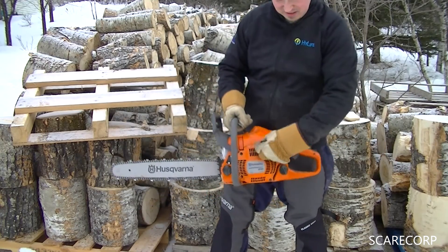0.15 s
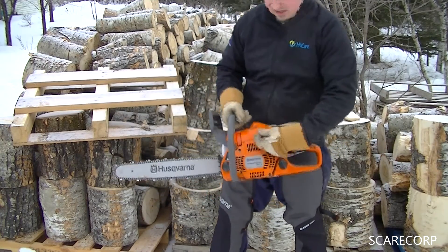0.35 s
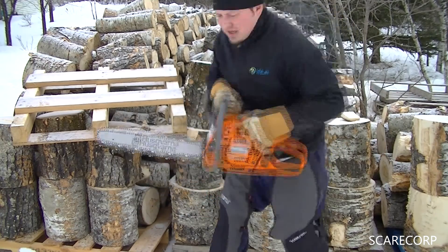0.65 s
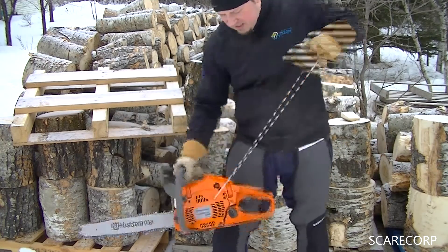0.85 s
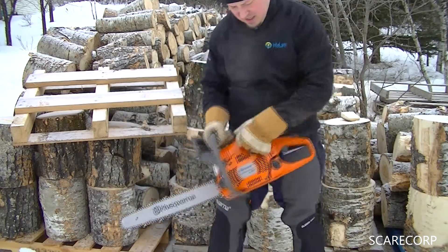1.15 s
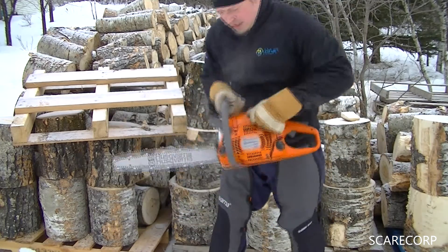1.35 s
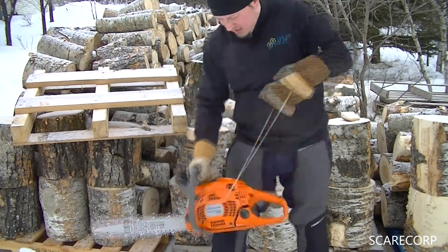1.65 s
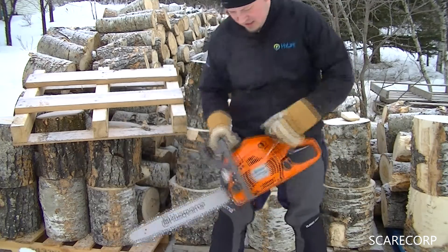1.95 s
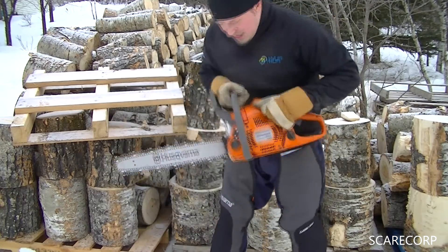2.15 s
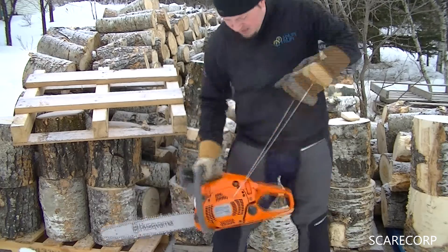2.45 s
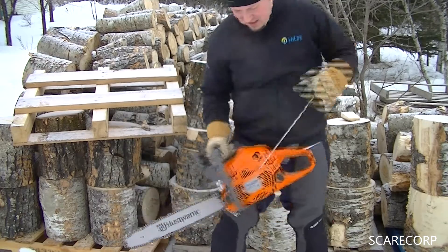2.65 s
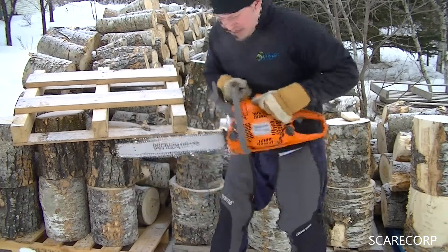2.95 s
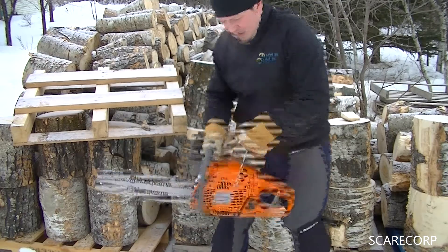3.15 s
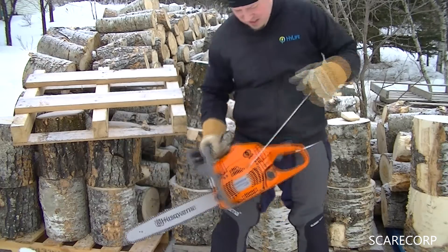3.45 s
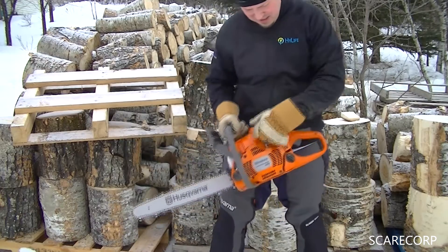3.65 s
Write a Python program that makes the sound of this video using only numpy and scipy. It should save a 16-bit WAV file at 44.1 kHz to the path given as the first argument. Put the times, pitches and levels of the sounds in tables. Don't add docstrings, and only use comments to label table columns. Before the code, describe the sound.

A chainsaw rope starter is yanked four times, puffing and whirring, but the engine never catches.

```python
import sys
import numpy as np
from scipy import signal
from scipy.fft import rfft, irfft
from scipy.io import wavfile
from scipy.ndimage import uniform_filter1d

SR = 44100
rng = np.random.default_rng(int(sys.argv[2]) if len(sys.argv) > 2 else 0)


def transcribe(u):
    v = np.clip(np.atleast_2d(u).T, -1, 1)
    q = np.round(v * 32767).astype(np.int16)
    wavfile.write(sys.argv[1], SR, q)


def gain_from_decibels(decibels):
    exponent = np.asarray(decibels, float) / 20
    return 10 ** exponent


N = 167580


def read(points, hz):
    f, value = np.transpose(points)
    return np.interp(np.log(hz + 1), np.log(f + 1), value)


def evened(x):
    return x / np.sqrt(np.mean(x ** 2) + 1e-20)


def drift(shape, passes):
    noise = rng.standard_normal(shape)
    for size, axis in passes:
        noise = uniform_filter1d(noise, size=size, axis=axis)
    return evened(noise)


def colour(x, points, lifts=()):
    hz = np.fft.rfftfreq(len(x), 1 / SR)
    resonances = sum(lift / (1 + ((hz - f) / width * 2) ** 2) for f, width, lift in lifts)
    below = hz < points[0][0] * .5
    db = read(points, hz) + resonances - 60 * below
    return irfft(rfft(x) * gain_from_decibels(db), len(x))


def add(mix, s, sound):
    part = mix[round(s * SR):][:len(sound)]
    part += sound[:len(part)]


def ring(modes, spread_db, detune, rise_s, scatter=1):
    t = np.arange(4500) / SR
    tones = np.zeros(len(t))
    for hz, t60, db in modes:
        louder, sharper, phase = rng.standard_normal(3)
        fade = gain_from_decibels(db + spread_db * louder - 60 * t / max(t60, .003))
        tones += fade * np.sin(2 * np.pi * hz * (1 + detune * sharper) * t + scatter * phase)
    return tones * (1 - np.exp(-t / max(rise_s, 1e-5)))


# (first puff [s], stretch of the turns [ratio], extra drag [1/s],
# ninth puff [dB], tenth puff [dB])
YANKS = [
    (.786, 1.06, .12, -8, -14),
    (1.636, 1, 0, 0, 0),
    (2.425, 1.01, .28, -3, -3),
    (3.204, .972, 0, 5, -5),
]
# (time after the first [s], puff level [dB])
PISTON_TURNS = [(0, -16), (.029, -16), (.055, -17), (.079, -18.5), (.102, -20), (.127, -16), (.156, -16.5),
                (.188, -17.5), (.233, -22), (.285, -28)]


def turn_times(first, stretch, drag):
    s = np.array(PISTON_TURNS)[:, 0]
    return first + s * (stretch + drag * s)


# (frequency [Hz], t60 [s], level [dB])
MUFFLER_MODES = [(760, 0.05, 0), (660, 0.05, -3), (420, 0.04, -9), (313, 0.04, -15)]
PUFF_RISE_S, PORT_OPEN_S = .002, .0095


def puff(spread_db, detune, scatter):
    tone = ring(MUFFLER_MODES, spread_db, detune, PUFF_RISE_S, scatter)
    t = np.arange(len(tone)) / SR
    return tone * np.exp(-(t / PORT_OPEN_S) ** 3)


# (frequency [Hz], t60 [s], level [dB])
INTAKE_MODES = [(1604, 0.013, 1), (1513, 0.0083, -10.5)]
PUFF_DB, BACK_PUFF_DB, INTAKE_DB = 1.5, -8, -3.5
BACK_PUFF_AT = .5


def piston():
    out = np.zeros(N)
    for first, stretch, drag, ninth_db, tenth_db in YANKS:
        forward = turn_times(first, stretch, drag)
        back = forward + BACK_PUFF_AT * np.gradient(forward)
        level = np.array(PISTON_TURNS)[:, 1] + PUFF_DB
        level[-2:] += ninth_db, tenth_db
        for s, back_s, db in zip(forward, back, level):
            add(out, s - .001, gain_from_decibels(db) * puff(1, .015, 0))
            add(out, back_s, gain_from_decibels(db + BACK_PUFF_DB) * puff(2, .05, 1))
            add(out, back_s, gain_from_decibels(db + INTAKE_DB) * ring(INTAKE_MODES, 4, .03, .0015))
    return out


GRIT_PER_S, GRIT_DB = 1800, 3


def grit():
    out, t = np.zeros(N), np.arange(400) / SR
    for hz in np.geomspace(600, 13000, num=16):
        hits = rng.random(N) < GRIT_PER_S / SR * hz / 6e4
        size = hits * gain_from_decibels(GRIT_DB * np.minimum(rng.exponential(1, N), 3))
        scrape = np.sin(2 * np.pi * hz * t) * t * np.exp(-t * hz / 1.68)
        out += evened(signal.oaconvolve(size, scrape)[:N]) * np.sqrt(hz)
    return evened(out)


# (frequency [Hz], density [dB per Hz])
WHIRR_SPECTRUM = [(88, -67), (150, -15.5), (774, 0), (998, -5.5), (1630, -7), (3550, -12.5), (6770, -11),
                  (11000, -25.5), (16000, -46)]
# (frequency [Hz], width [Hz], lift [dB])
HOUSING_LIFTS = [(1670, 400, 8), (2815, 740, 10), (4092, 98, 11), (4990, 1000, 6), (6640, 760, 0)]
# (pawls catch [s], rope end [s], rewind start [s], rewind end [s])
YANK_STAGES = [
    (.75, .885, 1.085, 1.17),
    (1.593, 1.731, 1.972, 2.04),
    (2.385, 2.515, 2.712, 2.803),
    (3.163, 3.298, 3.52, 3.62),
]
# (yank [dB], coast start [dB], coast end [dB], rewind [dB], settling [dB])
YANK_EFFORT = [
    (-22.5, -31.5, -24.5, -29, -45),
    (-21.5, -29, -30, -34, -44.5),
    (-22, -29.5, -27.5, -30.5, -44.5),
    (-21.5, -30, -28.5, -32.5, -50),
]
WHIRR_DB, GRIT_SHARE, PATCH_DB = -.5, .4, 3
REACH_S, REACH_DB = .018, -18.5
SLACK_DB, TAKE_UP_S, YANK_RISE_DB, SETTLE_S = -9, .042, 3, .13
THROB_DB, THROB_LAG = 1, .96
PUMP_DB, PUMP_DIP_DB = 4, -6
COAST_DULL_DB, REWIND_BRIGHT_DB = -4.5, 1.5


def whirr():
    rub = GRIT_SHARE * grit() + (1 - GRIT_SHARE) * rng.standard_normal(N)
    drive = evened(colour(rub, WHIRR_SPECTRUM, HOUSING_LIFTS))
    hz, t, z = signal.stft(drive, SR, nperseg=256, noverlap=192)
    db, treble, pump = np.full(len(t), -120.), np.zeros(len(t)), np.zeros(len(t))
    for stage, effort, pull in zip(YANK_STAGES, YANK_EFFORT, YANKS):
        catch, end, rewind, stop = stage
        yank, coast_start, coast_end, back, rest = effort
        taut = catch + TAKE_UP_S
        s = [catch - REACH_S, catch - .001, catch, taut, taut + .0034, end + .0087,
             end + .02, rewind - .015, rewind, stop - .008, stop + .0042, stop + SETTLE_S]
        level = [yank + 2 * REACH_DB, yank + REACH_DB, yank + SLACK_DB, yank + SLACK_DB,
                 yank - YANK_RISE_DB, yank, coast_start, coast_end, back, back, rest, rest - 14]
        on = (t > s[0]) & (t < s[-1])
        coast = (t > end + .025) & (t < rewind)
        turns = np.interp(t, turn_times(*pull[:3]), np.arange(len(PISTON_TURNS)), np.nan, np.nan)
        throb = np.nan_to_num(np.cos(2 * np.pi * (turns - THROB_LAG)))
        throb *= THROB_DB * (.33 + 1.75 * coast)
        pump += np.nan_to_num(PUMP_DIP_DB + PUMP_DB * np.cos(4 * np.pi * (turns - .15)))
        db[on] = (np.interp(t, s, level) + throb)[on]
        treble += COAST_DULL_DB * coast + REWIND_BRIGHT_DB * ((t >= rewind) & on)
    octaves = np.clip(np.log2(hz[:, None] / 5000 + 1e-3), 0, 2)
    patches = PATCH_DB * drift(z.shape, [(5, 0), (5, 1)])
    field = db + WHIRR_DB + treble * octaves + patches + pump * (hz[:, None] < 950)
    return signal.istft(z * gain_from_decibels(field), SR, nperseg=256, noverlap=192)[1][:N]


# (time [s], peak level [dB])
RATCHET_TEETH = [(1.0885, -10), (1.101, -12), (1.111, -14), (1.122, -15), (1.1314, -12.5), (1.143, -17),
                 (1.1597, -14), (1.9727, -15.5), (1.979, -17), (1.9901, -13.5), (2.0056, -13),
                 (2.009, -13.5), (2.0244, -15.5), (2.711, -18), (2.7181, -11), (2.7307, -10), (2.741, -15),
                 (2.7517, -10.5), (2.761, -20), (2.7742, -13), (2.7875, -13), (2.799, -26), (3.516, -40),
                 (3.5246, -21), (3.5368, -9.5), (3.5487, -9), (3.557, -12.5), (3.563, -14), (3.5724, -12),
                 (3.586, -11), (3.6009, -13.5)]


def teeth():
    return [(s, db - 1.5, -8) for s, db in RATCHET_TEETH]


# (time [s], peak level [dB], low body [dB])
FIRST_KNOCKS = [(0.7502, -11, -4.5), (0.763, -28, 6), (0.781, -19.5, -18), (0.834, -8, -10.5),
                (0.9043, -20.5, 0), (0.982, -16.5, -31), (1.0222, -12.5, -6.5), (1.0323, -12.5, -6.5),
                (1.044, -24, 7), (1.1868, -20, -3.5), (1.2122, -11.5, -9), (1.27, -37.5, -16)]
SECOND_KNOCKS = [(1.5932, -5, -8), (1.6107, -28, 8), (1.64, -31, 7), (1.7869, -10.5, -34),
                 (1.8165, -15.5, -7), (1.859, -7, -11), (1.878, -17, -10), (1.91, -14.5, -7.5),
                 (1.93, -22, -10), (2.048, -17, -5.5), (2.0944, -23, -6), (2.114, -31, 0)]
THIRD_KNOCKS = [(2.3849, -4.5, -10), (2.4171, -12, -17), (2.502, -16, -13), (2.5327, -15, -1),
                (2.5798, -16, -4), (2.617, -17, -3.5), (2.6552, -17, -20), (2.6686, -12.5, -31),
                (2.823, -19.5, -5.5), (2.8964, -19.5, 1.5)]
LAST_KNOCKS = [(3.1631, -4.5, -6.5), (3.1977, -11.5, -7.5), (3.2991, -11.5, -12.5), (3.3505, -15.5, -25),
               (3.419, -19, -19), (3.4249, -12.5, -17), (3.4576, -20, -6), (3.4727, -17.5, -12),
               (3.4883, -16.5, -18), (3.6351, -14.5, -8), (3.715, -30, 3)]
# (time [s], peak level [dB], low body [dB])
GLOVE_TICKS = [(0.0336, -31, -11.5), (0.2906, -42, -8), (0.34, -41.5, -11), (0.32, -39, -4),
               (0.46, -34.5, -19), (1.45, -44, 3), (1.508, -35, -23), (2.254, -45, -19), (3.032, -53, -13),
               (2.278, -36.5, -31)]
# (frequency [Hz], density [dB per Hz])
CRACK_SPECTRUM = [(1180, -2.5), (2000, -1.5), (3140, -1.5), (4530, 1), (6940, 1), (8260, -7.5),
                  (13500, -24.5), (16000, -42)]
# (frequency [Hz], t60 [s], level [dB])
PAWL_MODES = [(3063, .03, -3), (4200, .06, -3), (5240, .025, -1), (7100, .06, -3), (7450, .05, -5),
              (8550, .3, -24), (9150, .06, -16), (10100, .03, -10), (13050, .07, -24), (15500, .04, -29)]
KNOCK_DB, KNOCK_RISE_S = -7, .0011
CRACK_T60, TOOTH_LINGER = .03, 1.44
SNAP_DB, SNAP_T60, RATTLE_DB, RATTLE_T60, BODY_DB, BODY_T60 = -7.5, .012, -12, .023, 4, .058
PAWL_PULL_DB, PAWL_REWIND_DB, PAWL_SPREAD_DB = -19, -6, 3


def knocks():
    out, t = np.zeros(N), np.arange(2500) / SR
    body_spectrum = [(500, -12), (1000, 4.0), (1650, 7.0), (2500, -2.5), (4000, -40)]
    blows = FIRST_KNOCKS + SECOND_KNOCKS + THIRD_KNOCKS + LAST_KNOCKS + GLOVE_TICKS + teeth()
    for s, db, low_db in blows:
        rewinding = any(start < s < stop for _, _, start, stop in YANK_STAGES)
        linger = TOOTH_LINGER if rewinding else 1
        fade = gain_from_decibels(-60 * t / CRACK_T60 / linger)
        fade += gain_from_decibels(SNAP_DB - 60 * t / SNAP_T60)
        fade += gain_from_decibels(RATTLE_DB - 60 * t / RATTLE_T60)
        crack = fade * evened(colour(rng.standard_normal(len(t)), CRACK_SPECTRUM, HOUSING_LIFTS))
        body = evened(colour(rng.standard_normal(len(t)), body_spectrum))
        body *= gain_from_decibels(low_db + BODY_DB - 60 * t / BODY_T60)
        rise = np.minimum(t / KNOCK_RISE_S, 1) ** 2
        add(out, s, gain_from_decibels(db + KNOCK_DB) * (crack + body) * rise)
        pawl_db = PAWL_REWIND_DB if rewinding else PAWL_PULL_DB
        pawls = ring(PAWL_MODES, PAWL_SPREAD_DB, .00504, .00027)
        add(out, s, gain_from_decibels(db + KNOCK_DB + pawl_db) * pawls)
    return out


# (time [s], frequency [Hz], level [dB])
LOOSE_PARTS = [(0.836, 2920, -12.5), (1.111, 1630, -15), (1.861, 4720, -10), (1.913, 4160, -13),
               (2.094, 6600, -37), (2.116, 6000, -34), (2.469, 1630, -10), (2.897, 6000, -17.5),
               (3.428, 4200, -16), (3.549, 5100, -13), (3.557, 2930, -12), (3.573, 5100, -20),
               (3.635, 5240, -15.5)]
CLINK_T60, CLINK_RISE_S = .014, .00033


def clinks():
    out = np.zeros(N)
    for s, hz, db in LOOSE_PARTS:
        pair = [(hz, CLINK_T60, db), (hz * 1.06, CLINK_T60, db - 5)]
        add(out, s, ring(pair, 0, 0, CLINK_RISE_S))
    return out


# (frequency [Hz], t60 [s], level [dB])
SPRING_MODES = [(8470, 0.077, -9.5), (9000, 0.016, 2.5), (9670, 0.019, -7), (3800, 0.049, -13),
                (6770, 0.014, -2)]
PING_DB, PING_S = -22.5, .013


def rope_end():
    out = np.zeros(N)
    for _, end, _, _ in YANK_STAGES:
        for late in np.linspace(0, PING_S, num=5):
            add(out, end + late, gain_from_decibels(PING_DB) * ring(SPRING_MODES, 1.6, .019, .00046))
    return out


ECHO_T60 = .11


def echoes(x):
    t = np.arange(6000) / SR
    signs = rng.choice([-1., 1.], len(t))
    present = (rng.random(len(t)) < .045) * (t > .003)
    taps = signs * present * gain_from_decibels(-60 * t / ECHO_T60)
    return signal.oaconvolve(x, taps / np.linalg.norm(taps))[:N]


# (frequency [Hz], density [dB per Hz])
TRAFFIC_SPECTRUM = [(15, -117), (25, -101), (317, -18.5), (416, -18.5), (489, -6), (545, -8), (1020, -8.5),
                    (1260, -15), (16000, -58.5)]
# (time [s], level [dB])
TRAFFIC_LEVEL = [
    (0, -49),
    (.7, -49),
    (1.4, -47.5),
    (2.2, -47),
    (3.0, -40.5),
    (3.8, -42.5),
]
# (frequency [Hz], density [dB per Hz])
JACKET_SPECTRUM = [(880, -21), (1500, -4), (3410, -13), (5440, -7.5), (11300, -28.5), (14600, -39),
                   (16000, -61)]
# (centre [s], half width [s], level [dB])
ARM_MOVES = [(.08, 0.11, -62.5), (.25, 0.023, -59), (.38, 0.079, -58.5), (0.661, 0.096, -49),
             (1.36, 0.088, -63.5), (1.512, 0.05, -50.5), (2.302, 0.11, -51), (2.85, 0.041, -69),
             (3.073, 0.061, -51), (3.79, 0.045, -75)]
TRAFFIC_PATCH_DB = 1


def yard():
    t = np.arange(N) / SR
    s, level = np.transpose(TRAFFIC_LEVEL)
    swell = drift(N, [(900, 0), (900, 0)])
    z = signal.stft(colour(rng.standard_normal(N), TRAFFIC_SPECTRUM), nperseg=1024)[2]
    patches = drift(z.shape, [(4, 0), (10, 1)])
    far = evened(signal.istft(z * gain_from_decibels(TRAFFIC_PATCH_DB * patches), nperseg=1024)[1][:N])
    far *= gain_from_decibels(np.interp(t, s, level) - 1.5 + 1.04 * swell)
    moves = sum(gain_from_decibels(db) * np.exp(-((t - c) / w) ** 2) for c, w, db in ARM_MOVES)
    roughness = np.repeat(rng.standard_normal(N // 40 + 1), repeats=40)[:N]
    fibres = rng.standard_normal(N) * gain_from_decibels(2.5 * roughness)
    return far + moves * evened(colour(fibres, JACKET_SPECTRUM))


# (frequency [Hz], side minus mid [dB])
WIDTH_SPECTRUM = [(60, -14), (200, -36.5), (600, -40.5), (1700, -36), (5000, -28), (8500, -28),
                  (12000, -32.5)]
ECHO_DB, SIDE_DB, LOW_CUT_HZ = -17.5, 2.5, 205


def scene():
    saw = piston() + whirr() + knocks() + clinks() + rope_end()
    saw = signal.sosfilt(signal.butter(2, LOW_CUT_HZ, "high", fs=SR, output="sos"), saw)
    mid = saw + gain_from_decibels(ECHO_DB) * echoes(saw) + yard()
    spread = np.roll(saw, shift=9) - .067 * np.roll(saw, shift=31)
    side = gain_from_decibels(SIDE_DB) * colour(spread + gain_from_decibels(11.5) * yard(), WIDTH_SPECTRUM)
    return np.array([mid + side, mid - side])


def band_limit(x):
    return signal.sosfilt(signal.butter(12, 16800, fs=SR, output="sos"), x)


def record(dry):
    edge = signal.firwin(255, 16400, window=("kaiser", 9), fs=SR)[None]
    mix = signal.oaconvolve(np.clip(dry, -.99, .99), edge, "same")
    return band_limit(mix)


dry = scene()
out = record(dry)
transcribe(out)
```